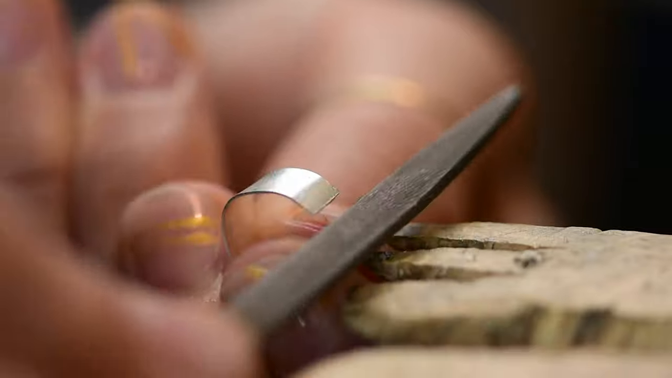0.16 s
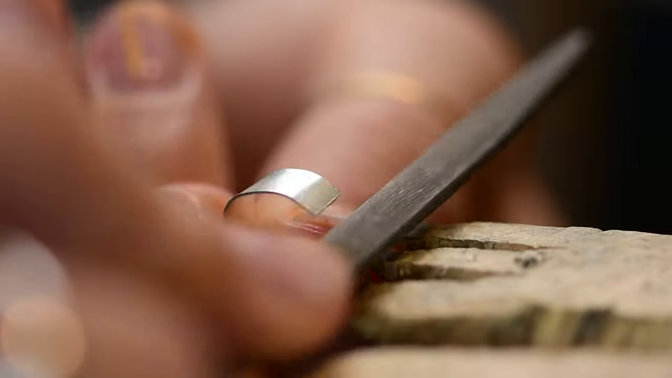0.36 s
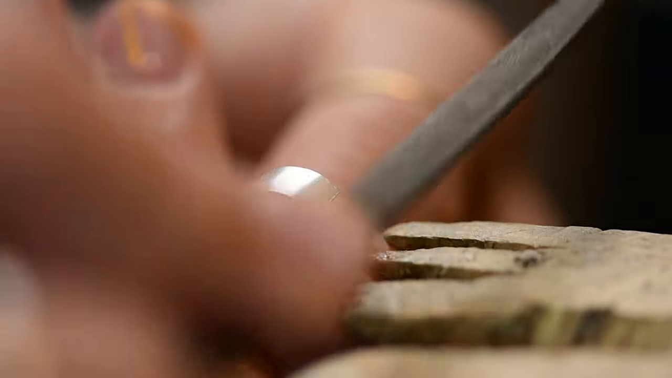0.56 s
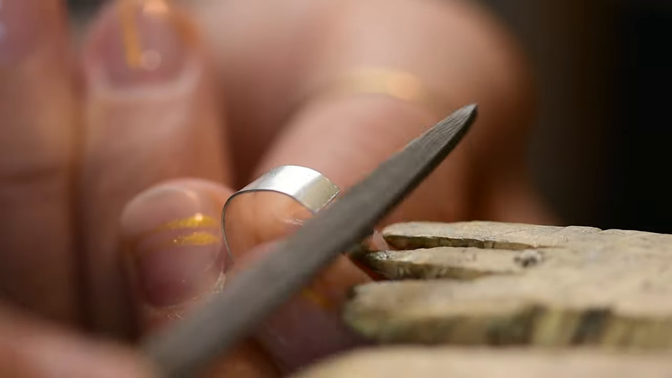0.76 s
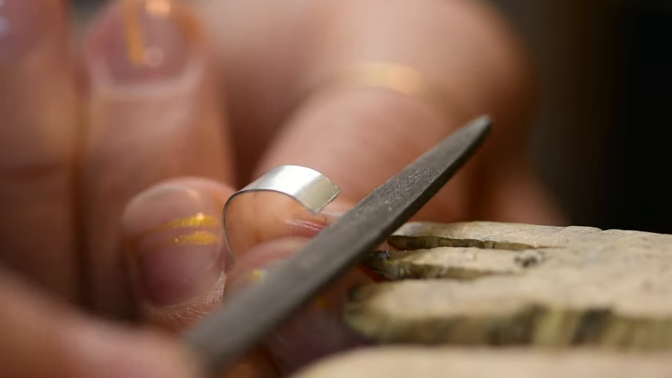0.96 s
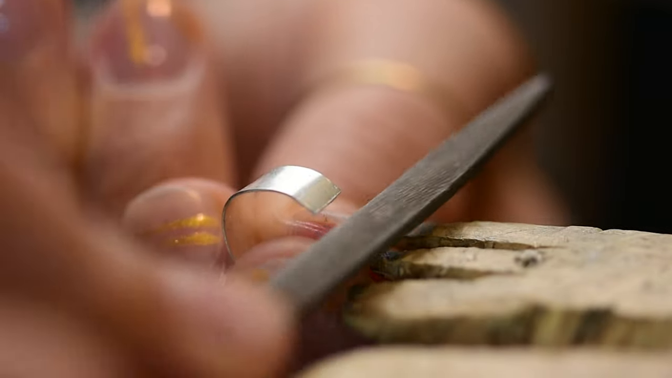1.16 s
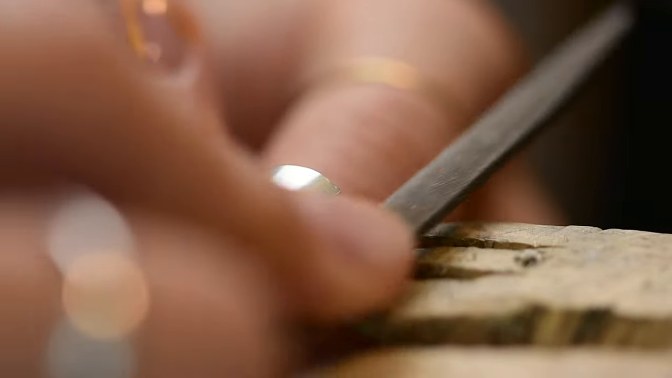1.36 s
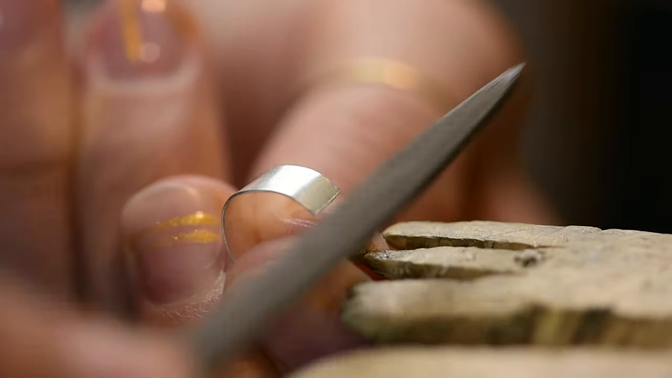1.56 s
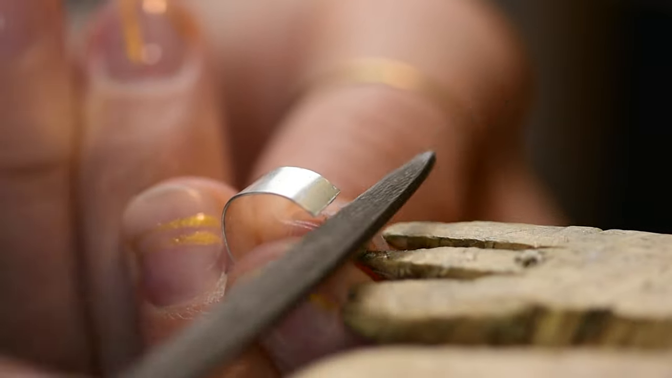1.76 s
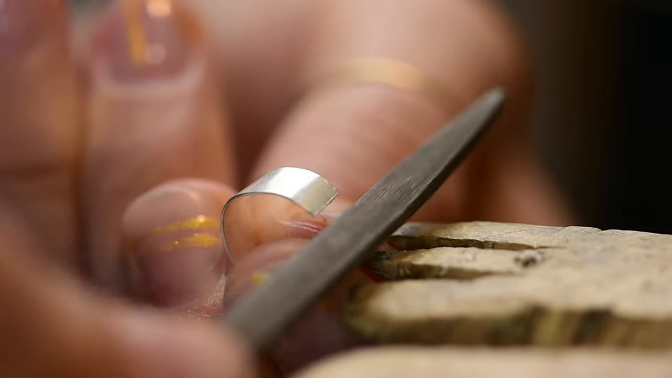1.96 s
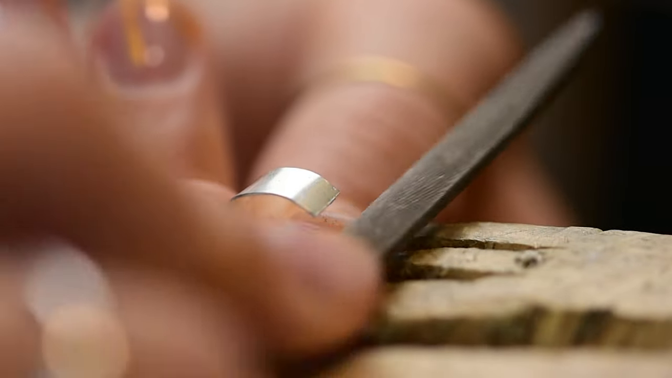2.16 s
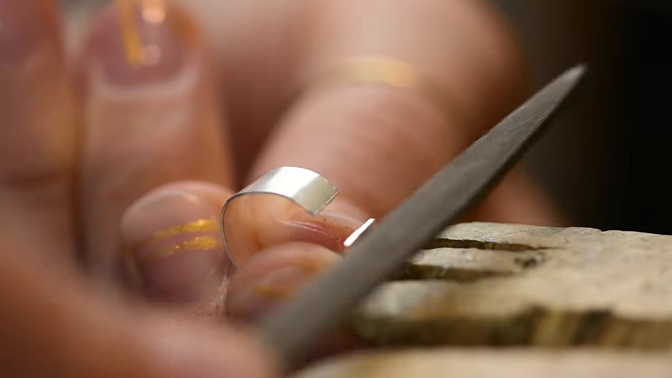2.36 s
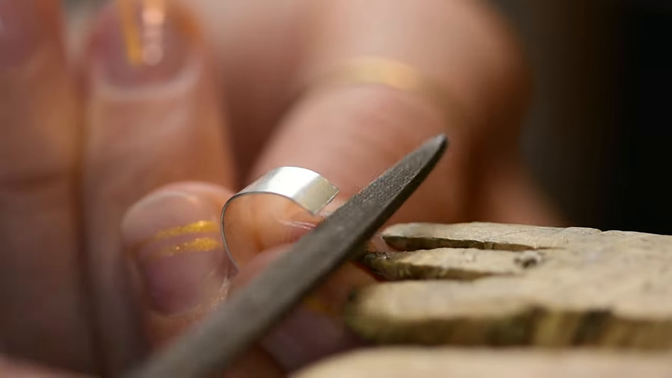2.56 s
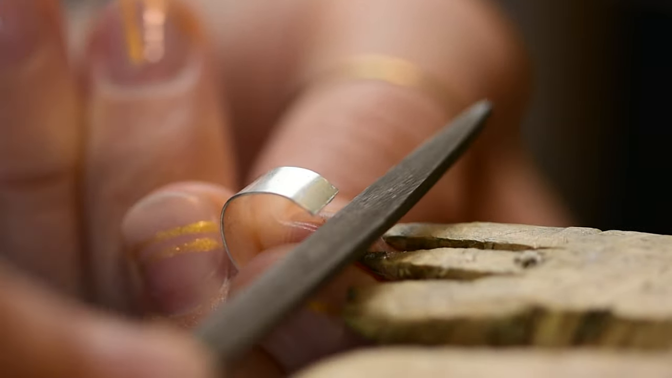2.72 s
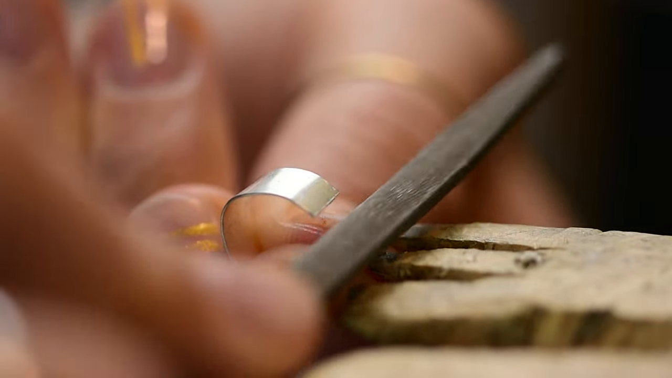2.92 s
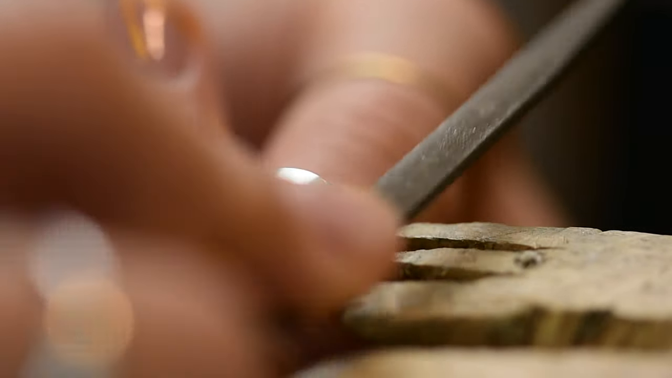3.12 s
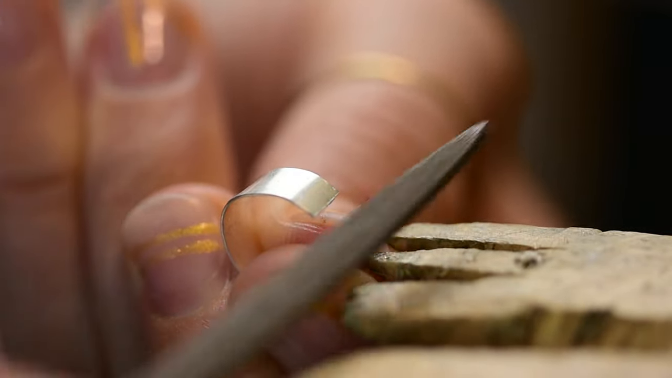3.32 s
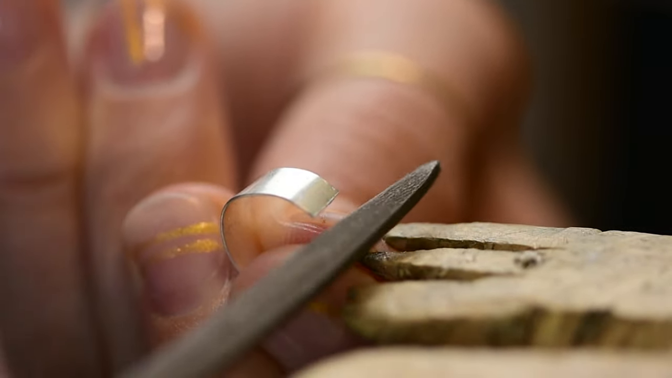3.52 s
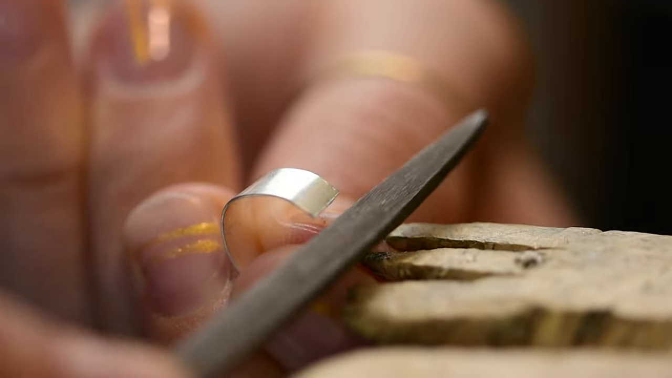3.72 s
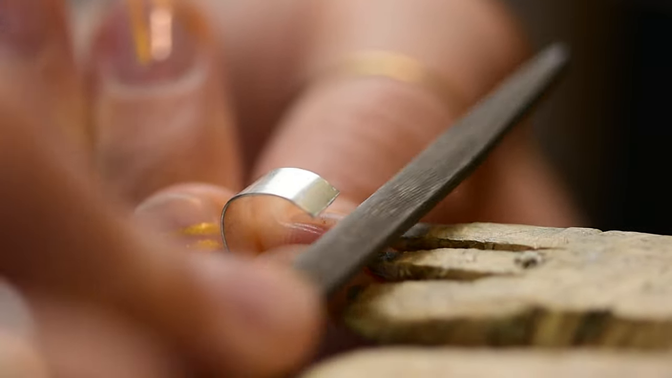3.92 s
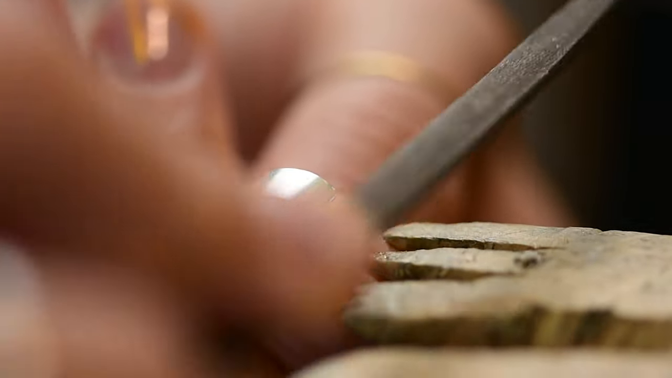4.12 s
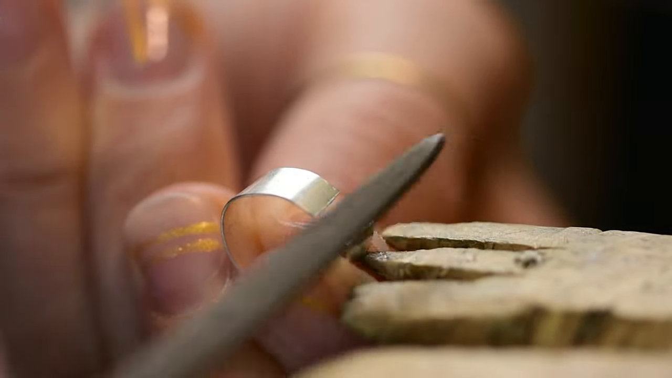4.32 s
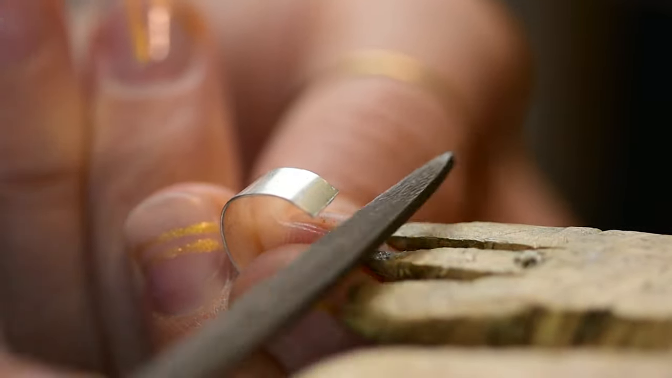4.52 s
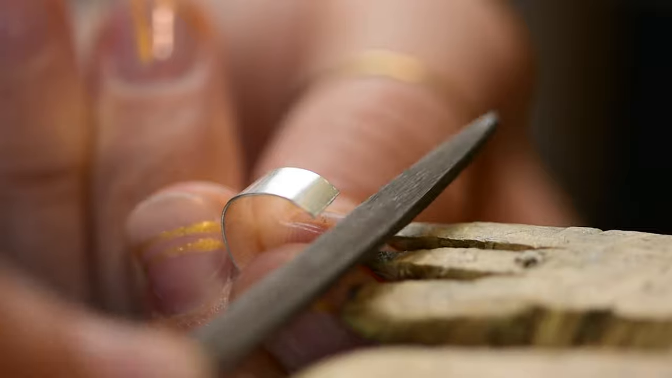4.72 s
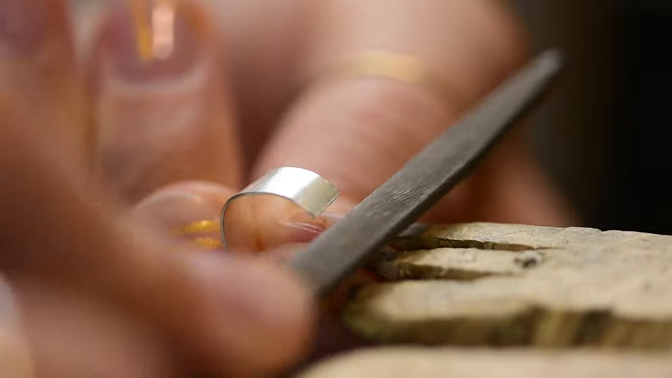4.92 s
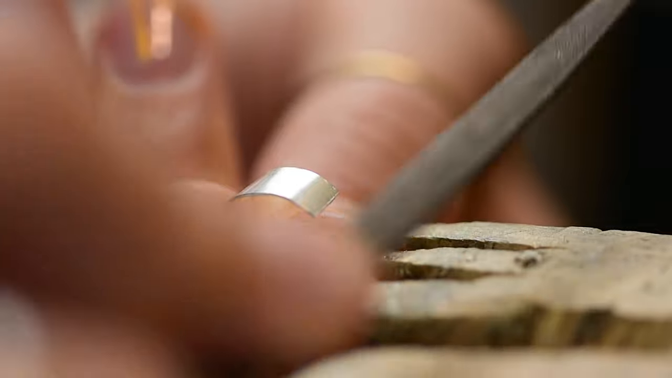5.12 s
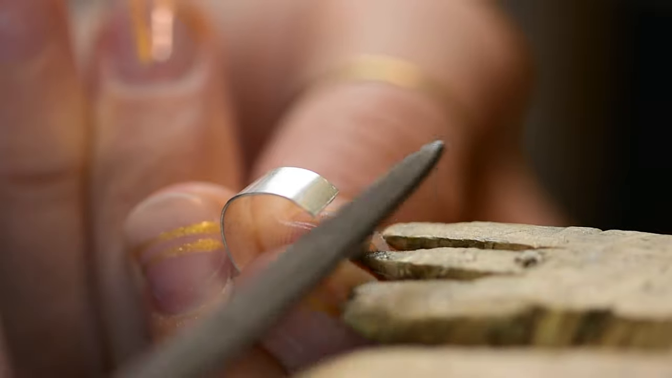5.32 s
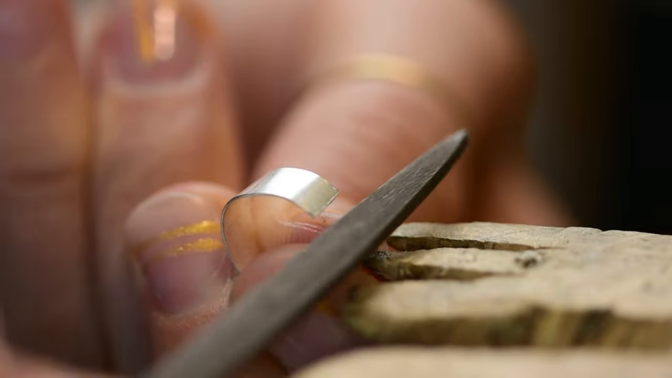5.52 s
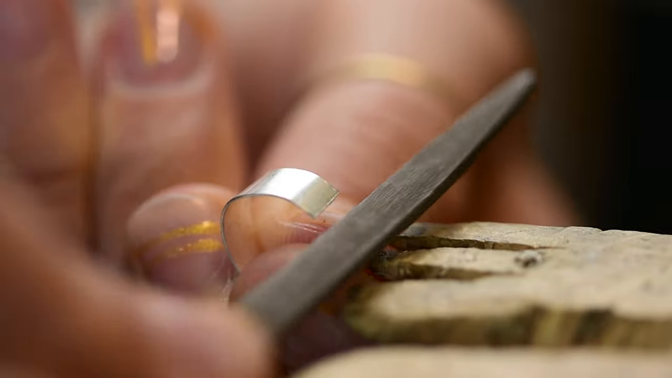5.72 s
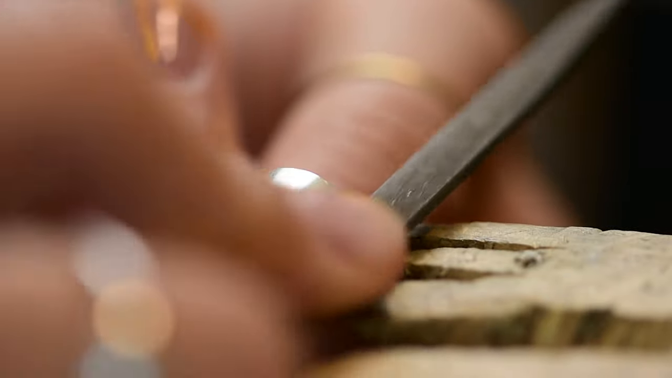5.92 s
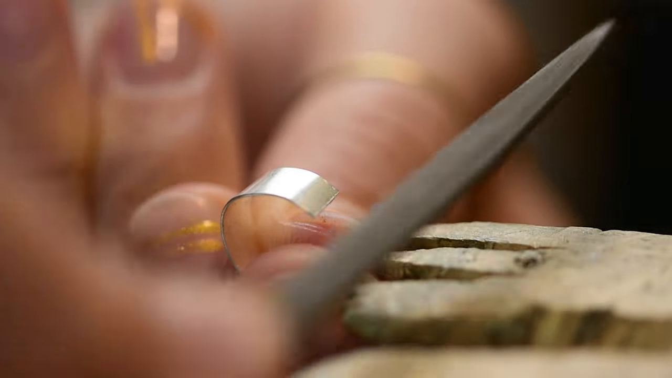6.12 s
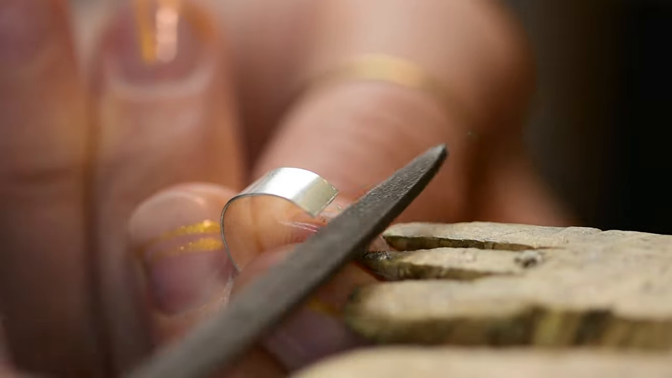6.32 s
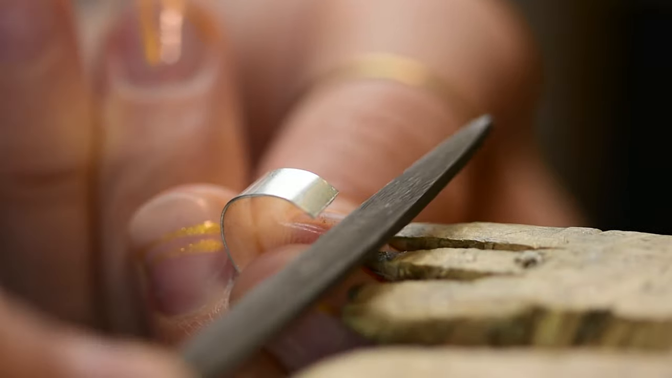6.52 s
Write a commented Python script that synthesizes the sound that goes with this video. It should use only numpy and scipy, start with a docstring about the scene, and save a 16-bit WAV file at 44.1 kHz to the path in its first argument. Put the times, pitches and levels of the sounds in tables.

```python
"""In a small workshop with a faint hum, a flat hand file is pushed in eight strokes across a silver strip.
The end of the strip is held on a wooden bench pin. Each stroke bites harder towards its end.
The rasp is a fast uneven train of noise bursts that rings filters for metal, pin, bench and cutting edges.
Short blows through the same bodies make the taps as the file is set down and the odd snag on a burr.
Some returns brush lightly over the work, and short decaying noise answers as the room."""
import sys
import numpy as np
from scipy import signal
from scipy.fft import rfft, irfft, next_fast_len
from scipy.io import wavfile
from scipy.ndimage import uniform_filter1d, map_coordinates

SR = 44100
rng = np.random.default_rng(int(sys.argv[2]) if len(sys.argv) > 2 else 0)


def unload_wav(signal):
    """Save mono or channel-first audio to the path in sys.argv[1] as 16-bit WAV at rate SR, clipped to [-1, 1]."""
    wavfile.write(
        sys.argv[1],
        SR,
        np.round(np.clip(np.atleast_2d(signal).T, -1, 1) * 32767).astype(np.int16),
    )


N = 294588

# Colour of the background air. Each row: frequency in Hz, relative density in dB per Hz.
AIR_COLOUR = [(20, -8.5), (55, -1), (100, 4), (150, -6), (420, -12.5), (520, -16.5), (1000, -19),
              (2000, -29.5), (4400, -35.5), (5000, -27.5), (7000, -34.5), (8600, -36), (9300, -28.5),
              (12700, -35.5), (13500, -28), (15700, -32.5)]
# Mains hum and a thin electrical whine. Each row: frequency in Hz, level in dB rms.
HUM_TONES = [(100, -60.5), (7127, -91), (14250, -88)]
# Decay of the workshop. Each row: frequency in Hz, time to fall 60 dB in seconds.
ROOM_DECAY = [(300, 0.33), (1000, 0.26), (4000, 0.12), (14000, 0.072)]
# Resonances of the bench, of the wooden pin, and of the file with the strip. Each row: centre in Hz,
# half width at half amplitude in Hz, level in dB under the file's tip, level in dB under its belly.
BENCH_MODES = [(174, 20, -29, -33.5), (206.3, 6.3, -17, -17), (244, 5.2, -28, -17.5), (294.6, 8, -14.5, -5),
               (313.8, 7.8, -6.5, -8), (348, 16, -9, -4.5), (371.4, 9, 0.5, 3.5), (390.8, 7.7, -1, -5),
               (415.5, 28.3, -6.5, -8.5)]
PIN_MODES = [(529, 15, -5, 0.5), (562.9, 23, -21, -3), (656, 26.3, -2, 2.5), (681, 20, -1, -13),
             (704.4, 22, 1, -5), (753, 18, 0.5, 4), (823, 45, -2, -5), (898, 12, 1.5, -0.5),
             (925, 27, -1.5, -30.5), (986, 45, -3.5, -9), (1040, 50, -7, -12), (1107, 57, -9, -8.5)]
METAL_MODES = [(1215, 26, -5, -2), (1307, 25, -2.5, 1.5), (1410, 53, -5, -3), (1499, 46, -3, 0),
               (1736, 47, -3, -4.5), (1844, 47, 1, -3.5), (1953, 123, -9.5, -4), (2186, 64, -10, -4),
               (2404, 29, -16, -8), (2625, 116, -11.5, -8), (2825, 98, -12.5, -7), (3150, 86, -8, -3),
               (3322, 46, -4, -4), (3580, 130, -11.5, -6.5), (4262, 206, -13, -7), (4532, 81, -15, -5.5),
               (5030, 77, -24, -13), (5450, 350, -15, -12.5), (6040, 75, -13.5, -6), (6450, 160, -6, -6),
               (6710, 96, -15.5, -12), (7130, 170, -15.5, -15.5), (7780, 84, -15, -13),
               (8430, 345, -18.5, -17.5)]
# Spectrum of the cutting edges. Each row: frequency in Hz, level in dB under the tip, dB under the belly.
EDGE_SPECTRUM = [(3900, -20, -59), (7300, -1, -10.5), (9100, -16, -6), (10170, -3, -9.5), (10500, 0.5, -1),
                 (11600, -5, -8.5), (12500, -3, 1), (13300, 0, -5.5), (14500, -10, 0), (15800, -20, -21)]
# The file lands or snags. Each row: time in seconds, knock of the pin in dB, ring of the metal in dB,
# tick in dB, hardness of the blow on the metal in Hz.
CONTACTS = [(0.016, -20, -50, -45.5, 1604), (0.514, -33, -35, -22, 12000), (0.8847, -8, -16.5, -32.5, 1447),
            (1.0827, -33, -40, -38.5, 9000), (1.1329, -15, -21, -36, 5985), (1.9645, -25, -19, -37, 9000),
            (2.251, -16.5, -47, -47, 5000), (2.615, -38, -57, -62, 999), (3.5161, -20.5, -35.5, -50, 1206),
            (3.7564, -27, -26, -47, 8900), (3.977, -11.5, -33, -42, 3000), (4.483, -17.5, -28.5, -20, 5040),
            (4.5836, -27.5, -29.5, -44, 5000), (5.4988, -30, -54.5, -51, 1999),
            (5.722, -12, -24, -44, 4000), (6.3889, -25.5, -41, -49, 1198), (6.4854, -27, -37, -57, 5904)]
# Forward strokes. Each row: touch, bite and letting go in seconds, rasp at the bite and at the end in dB,
# extra in the bench, in the pin and in the fizz in dB, boom of the bench's lowest modes in dB,
# band that the pin favours in Hz.
STROKES = [(0.0, 0.012, 0.516, -56.5, -47.5, -1.5, 0.5, 2, 6, 578.8),
           (0.945, 0.982, 1.409, -59, -43.5, -1, 0, 3.5, 11.5, 630),
           (1.789, 1.87, 2.255, -51.5, -45.5, -1.5, 0.2, 1.5, 6.5, 872.3),
           (2.65, 2.716, 3.11, -53, -46, -2, -0.5, -0.5, 2, 800),
           (3.556, 3.6, 4.086, -59.5, -45.5, 0, 0, -1, 4, 689.4),
           (4.665, 4.724, 5.084, -52.5, -44.5, 1, 0, 1, 4.5, 800),
           (5.489, 5.531, 6.005, -60, -42.5, -0.5, 0.5, -1, -1.5, 840.7),
           (6.44, 6.487, 6.95, -57.5, -42, 4, -1.5, 2, 4.5, 760)]
# How metal, bench, pin and cutting edges, in that order, answer the push. Each row: level against the
# rasp in dB, extra at the bite in dB, drop as the hand slows in dB, step at the release in dB, decay in dB/s.
ANSWERS = [(0, 0, -4, -8, 190), (9.5, -4.5, -3, -1, 200), (2.5, -1.5, -3, 0, 207),
           (-9.5, -9.5, -6, -8, 300)]
# The teeth skate (below 0) or dig in (above 0). Each row: time and half length in seconds, change in dB.
GRIPS = [(0.09, 0.02, 3), (0.195, 0.034, -5), (0.4, 0.016, -4), (0.445, 0.021, 1.5), (1.19, 0.04, 1.5),
         (1.256, 0.03, -2.5), (2.085, 0.042, 2.5), (2.235, 0.022, -2), (2.877, 0.02, -5.5),
         (3.055, 0.031, 3), (3.729, 0.027, -6), (3.791, 0.014, 3.5), (5.73, 0.058, 3), (5.9, 0.018, 3)]
# The work judders on the pin (above 0) or the fingers damp it (below 0).
# Each row: time and half length in seconds, change in the bench in dB, change in the pin in dB.
JUDDERS = [(0.503, 0.016, 4.5, -0.5), (1.03, 0.039, 8.5, 0), (1.32, 0.036, 3.5, 0), (1.38, 0.035, -1, 3.5),
           (2.11, 0.043, -2, 4), (2.22, 0.023, 7, 0), (3.004, 0.028, 6, -1), (3.1, 0.012, 8, 5),
           (3.794, 0.014, 4, -2), (3.86, 0.047, -5, 0), (5.75, 0.018, 8, 3), (5.81, 0.039, -4, 2.5),
           (5.945, 0.062, 4.5, -2.5), (6.675, 0.02, -0.5, 5)]
# The file brushes the work between strokes. Each row: time and half length in seconds, rasp in dB.
BRUSHES = [(1.66, 0.11, -73.5), (2.42, 0.08, -70.5), (4.305, 0.02, -77), (4.61, 0.025, -65)]

TOP_HZ = 15850  # band limit of the recorder
ROOM_DULL_HZ = 9100  # the walls return little above this
TOUCH_DB = -16  # a file that only touches, under one that bites
TOUCH_POWER = 0.7  # the teeth catch suddenly rather than gradually
TOUCH_LEAD_S = 0.008  # the first graze comes this long before the file settles
SWELL_POWER = 1.65  # the push grows fast at first, then levels off
EASE_S = 0.047  # the hand slows just before it lets go
RELEASE_S = 0.012  # time the teeth take to leave the edge
FIZZ_GRIP = 1.4  # the fizz follows the grip more steeply than the rasp does
BRUSH_PIN_DB = 1.5  # the pin's share of the brushing, against the rasp


def amp(db):
    """Decibels to gain."""
    return 10 ** (np.asarray(db) / 20)


def unit(x):
    """x at rms 1."""
    return x / np.sqrt(np.mean(x ** 2) + 1e-20)


def steady(x, span):
    """x held at rms 1 over span seconds."""
    power = np.abs(uniform_filter1d(x ** 2, int(span * SR) + 1))
    return x / np.sqrt(power + 1e-12)


def along(points, hz):
    """Reads (Hz, value) points on a log frequency axis."""
    f, v = np.transpose(points)
    return np.interp(np.log(hz + 1), np.log(f + 1), v)


def wobble(rate):
    """A smooth random curve, rate knots a second."""
    knots = rng.standard_normal(int(N * rate / SR) + 4)
    return map_coordinates(knots, [np.arange(N) * rate / SR])


def swells(rows):
    """A bell-shaped swell of height 1 for each row (time, half length, ..), followed by the other columns."""
    s, span, *columns = np.transpose(rows)
    t = np.arange(N) / SR
    return np.exp(-((t - s[:, None]) / span[:, None]) ** 2), *columns


def filtered(x, gain):
    """x times a gain that depends on frequency."""
    m = next_fast_len(N + SR // 2)
    return irfft(rfft(x, m) * gain(np.fft.rfftfreq(m, 1 / SR)), m)[:N]


def impulse(gain, size=16384):
    """The causal (minimum-phase) impulse response, of energy 1, that has this gain shape."""
    cepstrum = irfft(np.log(np.maximum(gain(np.fft.rfftfreq(size, 1 / SR)), 1e-6)))
    # folding the cepstrum forward in time makes the response causal
    cepstrum[1:size // 2] *= 2
    cepstrum[size // 2 + 1:] = 0
    h = irfft(np.exp(rfft(cepstrum)))
    return h / np.linalg.norm(h)


def ring(force, response):
    """A body's answer to a force."""
    return signal.fftconvolve(force, response)[:N]


def background(air_db, waver, whine_waver):
    """Room rumble and hiss as coloured noise, with hum and whine whose phases (radians) drift slightly."""
    t = np.arange(N) / SR
    air = unit(filtered(rng.standard_normal(N), lambda hz: amp(along(AIR_COLOUR, hz))))
    hum = np.zeros(N)
    for hz, db in HUM_TONES:
        drift = waver * wobble(3.8) + whine_waver * hz / TOP_HZ * wobble(60)
        hum += amp(db) * np.sqrt(2) * np.sin(2 * np.pi * hz * t + drift)
    return amp(air_db) * air + hum


def workshop(x):
    """The room's answer: a tail of decaying noise whose treble dies first."""
    hz, t, z = signal.stft(rng.standard_normal(SR * 3 // 4), SR, nperseg=256)
    decay = amp(-60 * t / along(ROOM_DECAY, hz)[:, None])
    tail = signal.istft(z * decay, SR, nperseg=256)[1]
    delayed = np.pad(unit(tail) / np.sqrt(len(tail)), (int(.004 * SR), 0))
    dulled = filtered(x, lambda hz: 1 / (1 + (hz / ROOM_DULL_HZ) ** 4))
    return ring(dulled, delayed)


def sway(at, span, db, sway_hz):
    """The bench rumbles briefly after the hardest landing: low noise under a bell-shaped swell."""
    rumble = unit(filtered(rng.standard_normal(N), lambda hz: 1 / (1 + (hz / sway_hz) ** 4)))
    return amp(db) * rumble * np.exp(-((np.arange(N) / SR - at) / span) ** 2)


def resonances(modes):
    """Impulse responses of a body with steep-sided modes, for tip and for belly contact."""
    centre, width, *levels = np.transpose(modes)

    def shapes(hz):
        return 1 / (1 + ((hz[:, None] - centre) / width) ** 2) ** 2

    return [impulse(lambda hz: np.sqrt(shapes(hz) @ amp(db) ** 2)) for db in levels]


def contacts(bench, pin, metal, edges, skid, skid_db, knock_hz, knock_width_hz, thud_db):
    """Each contact is a sharp blow with a short skid; it knocks the pin, rings the metal and ticks."""
    t = np.arange(SR // 4) / SR
    out = np.zeros(N + len(t))

    def lowpass(x, order, hz):
        return signal.sosfilt(signal.butter(order, hz, fs=SR, output="sos"), x)

    # a blow from above mostly wakes the middle modes of the pin
    knock = ring(pin, impulse(lambda hz: 1 / (1 + ((hz - knock_hz) / knock_width_hz) ** 2)))
    # a little of it thuds into the bench
    knock = knock[:len(bench)] / np.linalg.norm(knock) + amp(thud_db) * bench
    # steel on a sharp edge gives a very short, bright snap
    highpass = signal.butter(2, 13000, "high", fs=SR, output="sos")
    snap = lowpass(signal.sosfilt(highpass, signal.unit_impulse(len(t))), 8, TOP_HZ)
    for s, knock_db, ring_db, tick_db, hard_hz in CONTACTS:
        scrape = amp(skid_db - 60 * t / skid) * rng.standard_normal(len(t))
        blow = signal.unit_impulse(len(t)) + scrape
        cushioned = lowpass(blow, 1, min(hard_hz, TOP_HZ))
        parts = (blow, knock, knock_db), (cushioned, metal, ring_db), (snap, edges, tick_db)
        for force, body, db in parts:
            sound = ring(force, body)[:len(t)]
            out[round(s * SR):][:len(t)] += amp(db) * sound / np.linalg.norm(sound)
    return out[:N]


def teeth(speed, slow_hz, fast_hz, scatter, size_db, tear, rub):
    """Every tooth that passes tears a chip in a tiny burst, over the rubbing of the flats."""
    rate = (slow_hz + (fast_hz - slow_hz) * speed) * amp(.6 * wobble(25))
    at = np.flatnonzero(np.diff(np.floor(np.cumsum(rate) / SR)))
    grit = rng.standard_normal(N)
    chance = rng.standard_normal((N // 10, 2))[:len(at)]
    # scatter is a share of the spacing between teeth
    at = np.clip(at + scatter * SR / rate[at] * chance[:, 0], 0, N - 1).astype(int)
    bite_power = amp(size_db * np.clip(chance[:, 1], -2, 2)) ** 2
    catches = np.bincount(at, bite_power, N)
    tearing = np.exp(-np.arange(SR // 100) / (tear * SR))
    bursts = np.sqrt(np.abs(ring(catches, tearing)))
    return grit * (steady(bursts, span=0.08) + rub)


def chatter(per_second, jump, settle, drift_db):
    """The file grips and slips: the force jumps at each slip and settles again."""
    slips = (rng.random(N) < per_second / SR) * rng.random(N) ** 2
    settling = np.exp(-np.arange(SR // 40) / (settle * SR))
    return (1 + jump * ring(slips, settling)) * amp(drift_db * wobble(130))


def patchy(x, depth_db, order, size):
    """Every burr tears with its own colour: random gains over short patches of time and frequency."""
    z = signal.stft(x, nperseg=order)[2]
    field = uniform_filter1d(rng.standard_normal(z.shape), size, axis=0)
    field = uniform_filter1d(field, size, axis=1)
    return signal.istft(z * amp(depth_db * unit(field)), nperseg=order)[1][:N]


def held(x, favour_db, width_hz):
    """The hold of the fingers favours its own band of the pin in each stroke."""
    out = np.zeros(N)
    for touch, *_, centre in STROKES:
        start = max(int(touch * SR), 0)
        favoured = filtered(x, lambda hz: amp(favour_db / (1 + ((hz - centre) / width_hz) ** 2)))
        out[start:] = favoured[start:]
    return steady(out, span=0.044)


def stroke_controls(lead, travel, unsteady_db):
    """One push sets the gains of four bodies, the contact's place from tip (0) to belly (1), and the boom."""
    t = np.arange(N) / SR
    gains, belly, boom = np.zeros((4, N)), np.zeros(N), np.ones(N)
    level_db, early_db, ease_db, step_db, decay = np.transpose(ANSWERS)[:, :, None]
    for touch, bite, lift, bite_db, end_db, bench_db, pin_db, fizz_db, boom_db, _ in STROKES:
        near = (t > touch - TOUCH_LEAD_S) & (t < lift + .3)
        now = t[near]
        ahead = np.clip((lift - now) / (lift - bite), 0, 1)  # share of the stroke still to go
        attack = TOUCH_DB * np.maximum((bite - now) / (bite - touch), 0) ** TOUCH_POWER
        push = end_db + (bite_db - end_db) * ahead ** SWELL_POWER + attack
        # rasp and fizz drop sharply when the teeth let go, while the wood rings on
        easing = np.clip(1 - (lift - now) / EASE_S, 0, 1)
        after = np.maximum(now - lift, 0)
        release = ease_db * easing + step_db * np.minimum(after / RELEASE_S, 1) - decay * after
        extra = [[0], [bench_db], [pin_db], [fizz_db]]
        gains[:, near] += amp(push + level_db + early_db * ahead + release + extra)
        belly[near] = .5 + .5 * np.tanh((now - lift + lead) / travel)
        boom[near] = amp(boom_db)
    grips, grip_db = swells(GRIPS)
    judders, thrum_db, grind_db = swells(JUDDERS)
    brushes, brush_db = swells(BRUSHES)
    grip = grip_db @ grips + unsteady_db * wobble(30)
    changes = [grip, grip + thrum_db @ judders, grip + grind_db @ judders, FIZZ_GRIP * grip]
    rasp, thrum, grind, fizz = gains * amp(changes)
    brush = amp(brush_db) @ brushes
    return (rasp + brush, thrum, grind + amp(BRUSH_PIN_DB) * brush, fizz), belly, boom


def filing(bench, pin, metal, edges, boom_hz):
    """The tooth force drives all four bodies; the louder the rasp, the faster the file runs."""
    (rasp, thrum, grind, fizz), belly, boom = stroke_controls(lead=0.16, travel=0.11, unsteady_db=.5)
    speed = np.sqrt(rasp / rasp.max())
    cutting = teeth(speed, slow_hz=401.0, fast_hz=1249.6, scatter=.2, size_db=3, tear=0.00022, rub=0.29)
    slipping = chatter(per_second=260, jump=1.25, settle=0.001, drift_db=1.05)
    force = steady(cutting * slipping, span=.04)
    sharp = patchy(force, depth_db=2.0, order=192, size=5)
    dull = patchy(force, depth_db=0.5, order=1024, size=4)

    def drive(x, body):
        tip_sound, belly_sound = ring(x, body[0]), ring(x, body[1])
        return steady((1 - belly) * tip_sound + belly * belly_sound, span=0.038)

    table = thrum * drive(dull, bench)
    # a leaning hand brings out the bench's lowest modes
    table += (boom - 1) * filtered(table, lambda hz: 1 / (1 + (hz / boom_hz) ** 10))
    wood = table + grind * held(drive(dull, pin), favour_db=4.5, width_hz=120)
    return wood + rasp * drive(sharp, metal) + fizz * drive(sharp, edges)


def scene():
    """Strokes and contacts sound through the same bodies into the room."""
    bench, pin, metal = (resonances(modes) for modes in (BENCH_MODES, PIN_MODES, METAL_MODES))
    edge_hz, *edge_levels = np.transpose(EDGE_SPECTRUM)
    edges = [impulse(lambda hz: amp(along(np.c_[edge_hz, db], hz))) for db in edge_levels]
    strokes = filing(bench, pin, metal, edges, boom_hz=290.95)
    # the taps use the tip response of the pin and the belly responses of the rest
    taps = contacts(bench[1], pin[0], metal[1], edges[1], skid=0.018, skid_db=-21.0,
                    knock_hz=686, knock_width_hz=175, thud_db=-13)
    room = workshop(amp(-12.0) * strokes + amp(-4.0) * taps)
    rumble = sway(at=1.023, span=0.19, db=-55, sway_hz=38)
    air = background(air_db=-59.5, waver=0.57, whine_waver=1.1)
    return (strokes + taps + room + rumble + air)[None]


def record(dry):
    """The recorder keeps nothing above its band limit."""
    return filtered(dry[0], lambda hz: hz < TOP_HZ)[None]


dry = scene()
out = record(dry)
unload_wav(out)
```